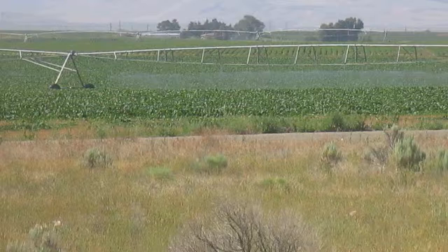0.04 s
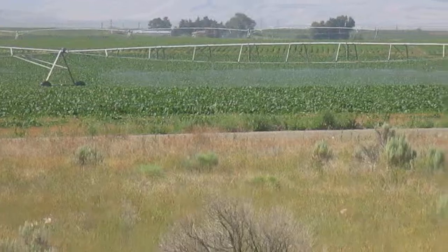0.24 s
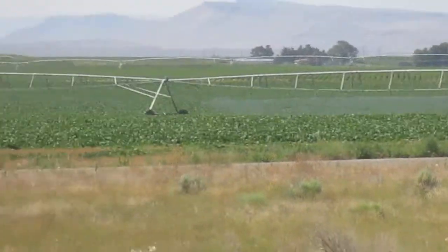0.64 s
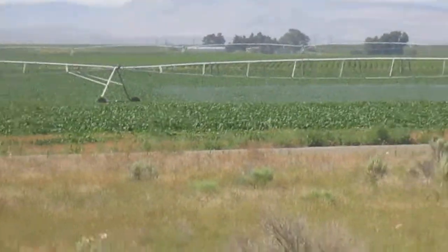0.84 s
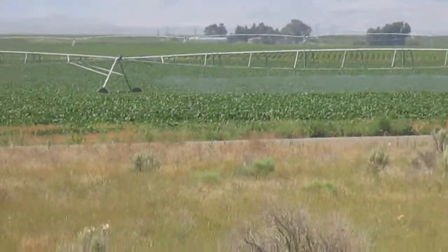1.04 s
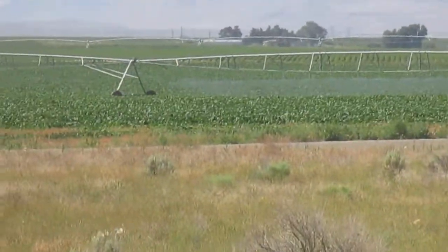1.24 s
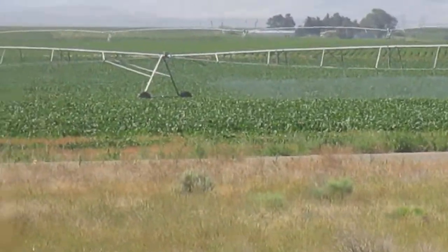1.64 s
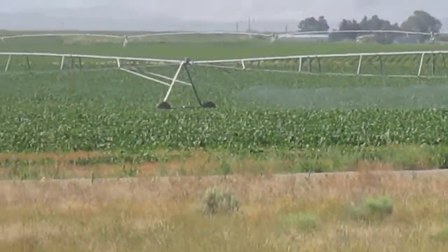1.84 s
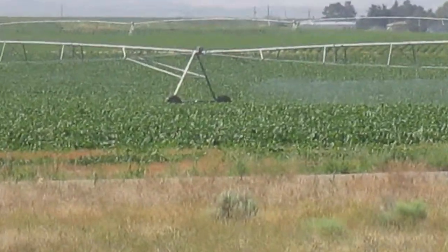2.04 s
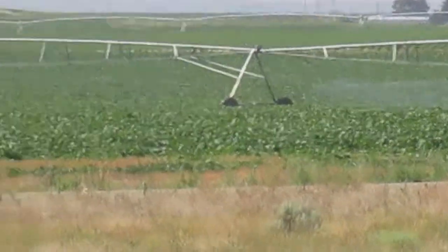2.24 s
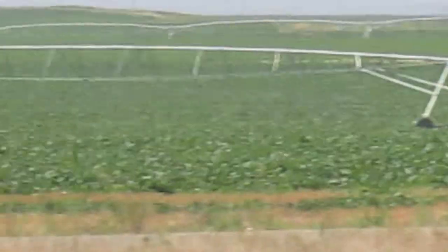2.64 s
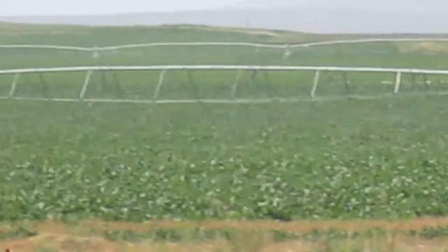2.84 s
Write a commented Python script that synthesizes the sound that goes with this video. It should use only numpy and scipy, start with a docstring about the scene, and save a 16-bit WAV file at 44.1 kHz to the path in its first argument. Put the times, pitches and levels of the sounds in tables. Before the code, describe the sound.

Wind on the microphone starts abruptly at about 0.2 seconds, with a low rumble, flutter and quick hard buffets that pop slightly. The gusts are strongest until 2 seconds, then ease, with another push near 2.5. Light camera clicks and creaks come around 0.5, 0.85, 1.2 and 2.55 seconds. Underneath, a cricket chirps very faintly about three times a second over the field's soft hiss.

```python
"""At the edge of a farm field, gusty wind blows on a camera microphone.
Swirls of air (eddies) tumble over its opening: hard buffets that just overload it,
a restless flutter, small pops and a low rumble. The camera body clicks and creaks in the hand.
A cricket chirps faintly in the grass by rubbing its wings, over far crickets and a soft hiss."""
import sys
import numpy as np
from scipy import signal
from scipy.fft import rfft, irfft
from scipy.io import wavfile
from scipy.ndimage import uniform_filter1d

SR = 44100
rng = np.random.default_rng(int(sys.argv[2]) if len(sys.argv) > 2 else 0)


def log_audio(samples):
    """Write samples as a 16-bit WAV file to the path given in sys.argv[1]."""
    # one column per channel
    frames = np.atleast_2d(samples).T
    # limit to full scale, then quantise
    limited = np.clip(frames, -1, 1)
    pcm = np.round(limited * 32767).astype(np.int16)
    wavfile.write(sys.argv[1], SR, pcm)


N = 127890
TIME = np.arange(N) / SR

# hard shoves of wind: peak t/s, length/s, level/dB, roll-off f/Hz (higher is brighter)
BUFFETS = [(0.259, 0.015, -8, 242), (0.336, 0.036, -11, 268.5), (0.36, 0.095, -19.5, 186),
           (0.499, 0.016, -14.5, 232), (0.523, 0.022, -7.5, 258), (0.542, 0.0088, -7, 360),
           (0.584, 0.011, -11, 332), (0.724, 0.017, -15.5, 310), (0.803, 0.018, -13, 217),
           (0.899, 0.045, -17.5, 190), (0.924, 0.012, -6, 210), (0.98, 0.024, -8.5, 297),
           (1.036, 0.04, -10, 268), (1.075, 0.037, -19.5, 372), (1.122, 0.021, -8.5, 310),
           (1.173, 0.034, -10.5, 300), (1.194, 0.033, -11, 256), (1.231, 0.094, -15.5, 356),
           (1.359, 0.027, -14.5, 230), (1.45, 0.022, -11.5, 244.5), (1.489, 0.026, -12, 257),
           (1.515, 0.025, -12, 267), (1.627, 0.024, -12.5, 186.5), (1.67, 0.024, -15.5, 261),
           (1.688, 0.025, -13, 260), (1.749, 0.045, -13.5, 270), (1.775, 0.035, -10.5, 334),
           (1.8, 0.036, -11.5, 444), (1.826, 0.096, -21.5, 376), (1.858, 0.034, -22.5, 419),
           (1.912, 0.038, -14.5, 394), (1.95, 0.045, -10.5, 327), (1.988, 0.06, -17.5, 475),
           (2.081, 0.04, -23.5, 294), (2.181, 0.017, -18, 350), (2.225, 0.026, -14, 285),
           (2.253, 0.04, -11.5, 321), (2.287, 0.035, -17, 283), (2.337, 0.011, -21.5, 310),
           (2.389, 0.041, -19.5, 302), (2.449, 0.0094, -27, 413), (2.484, 0.015, -10, 190),
           (2.526, 0.035, -14.5, 354), (2.624, 0.077, -21, 202), (2.705, 0.072, -25, 185)]
# airflow between the buffets: t/s, level/dB, roll-off f/Hz
AIRFLOW = [(0.24, -16.5, 170), (0.39, -26.5, 280), (0.43, -19.5, 120), (0.6, -18.5, 170), (0.7, -28, 160),
           (0.8, -22.5, 170), (0.87, -29.5, 190), (1.0, -16, 180), (1.25, -27.5, 190), (1.32, -31, 150),
           (1.39, -21.5, 180), (1.43, -36, 160), (1.53, -10.5, 180), (1.6, -38, 120), (1.75, -19.5, 190),
           (1.89, -30, 240), (2.04, -29.5, 230), (2.14, -24.5, 220), (2.2, -24.5, 160), (2.3, -24, 210),
           (2.5, -20, 210), (2.58, -50, 190), (2.66, -24.5, 210), (2.78, -56.5, 140), (2.84, -39.5, 140),
           (2.9, -22, 220)]
# cracks on the hardest buffets: t/s, peak level/dB, roll-off f/Hz
CRACKS = [(.335, -20.5, 1300), (.522, -24.5, 1300), (.543, -21, 300), (.982, -44, 387), (1.796, -18, 870),
          (1.918, -11, 245), (1.978, -23.5, 272), (1.989, -15, 250), (2.182, -30, 200), (2.25, -18.5, 220)]
# air rumbling round the whole camera: t/s, level/dB
RUMBLE_LEVELS = [(.25, -12.5), (.4, -21), (.6, -24), (.8, -17.5), (.95, -24.5), (1.12, -14), (1.25, -21),
                 (1.4, -26.5), (1.52, -20.5), (1.6, -28), (1.76, -17), (1.9, -27), (2.17, -25.5),
                 (2.25, -21.5), (2.5, -19.5), (2.57, -29), (2.7, -35), (2.8, -34.5), (2.9, -20)]
# the rumble's tone colour, or how strong each pitch is: f/Hz, level/dB
RUMBLE_COLOUR = [(10, -24.5), (22, -7), (40, -5.5), (62, -1), (95, -3.5), (135, -9), (185, -11),
                 (270, -27.5), (600, -86.5), (2000, -150)]
# big swirls that thump: peak t/s, level/dB
THUMPS = [(.337, -7.5), (.67, -16.5), (.9, -12), (.984, -11.5), (1.748, -13.5), (2.098, -17.5),
          (2.508, -16)]
# clicks of the camera body: t/s, level/dB, fade time/s
CLICKS = [(0.335, -44.5, .005), (0.52, -55, 0.0038), (0.724, -47, 0.0019), (0.75, -49.5, 0.0051),
          (0.8406, -31, 0.0012), (0.847, -33, 0.0023), (0.865, -36.5, 0.0037), (.898, -34, 0.0035),
          (1.191, -42.5, 0.0052), (1.198, -47, 0.0054), (1.794, -43.5, .003), (2.556, -38.5, 0.0059),
          (2.559, -35.5, 0.0023)]
# their tone colour: f/Hz, level/dB
CLICK_COLOUR = [(500, -33.5), (1300, -7), (2000, 11.5), (3000, 0), (4000, -4), (4900, -9.5), (7000, -6.5),
                (9500, -6.5), (12000, -18), (16000, -27)]
# creaks under the grip: peak t/s, level/dB, length/s
CREAKS = [(0.334, -47.5, .045), (0.513, -42, 0.01), (0.621, -57, 0.049), (1.195, -39, 0.05),
          (2.541, -55, 0.035), (2.563, -27, 0.01)]
# their tone colour: f/Hz, level/dB
CREAK_COLOUR = [(700, -32), (1400, -27), (1750, 4), (2050, 4.5), (2500, -6.5), (3500, -19.5), (5000, -30),
                (16000, -33)]
# notes the casing rings at: f/Hz, gain/dB, time to fade by 60 dB/s
CASING_NOTES = [(2024, -50.5, 0.061), (2810, -61, .12)]
# cricket chirps: first stroke t/s, number of wing strokes, level/dB
CHIRPS = [(0.274, 3, -59.5), (0.487, 4, -63), (.759, 4, -62), (1.072, 3, -69), (1.326, 3, -68),
          (1.556, 3, -65.5), (1.837, 3, -78.5), (2.173, 4, -74.5), (2.446, 3, -73.5), (2.703, 4, -78)]
# tone colour of the far crickets: f/Hz, level/dB
CHORUS_COLOUR = [(4300, -40), (5000, -8), (5250, 2.5), (5500, -6.5), (6000, -37.5)]
# hiss of the field: t/s, level/dB
HISS_LEVELS = [(.24, -50.5), (.33, -56.5), (.42, -63), (.61, -58), (.68, -64), (.8, -60.5), (1.0, -66),
               (1.3, -69.5), (1.65, -71), (1.85, -75), (2.15, -77), (2.5, -74.5), (2.9, -71.5)]
# its tone colour: f/Hz, level/dB
HISS_COLOUR = [(100, -10.5), (700, 3), (1400, 0), (2200, 0.5), (3400, -7), (4600, -12.5), (7000, -11.5),
               (9500, -12.5), (12000, -19.5), (16000, -18)]


def eddy(length_s, db, roll_off_hz, low_cut_hz=102, waver_depth=0.18, waver_hz=110):
    """One swirl crosses the opening: a pressure wobble, louder and brighter when it speeds up."""
    t = (np.arange(2 ** 13) - 2 ** 12) / SR
    opening = lambda f: np.exp(-(f / roll_off_hz) ** 1.454) * f ** 2 / (f ** 2 + low_cut_hz ** 2)
    stir, waver = rng.standard_normal((2, len(t)))
    speed = np.exp(waver_depth * unit_power(filtered(waver, lambda f: np.exp(-(f / waver_hz) ** 2))))
    pressure = steadied(filtered(stir, opening), window_s=0.016)
    wobble = np.interp(np.cumsum(speed), np.arange(len(t)), pressure)  # read at the wavering speed
    envelope = np.exp(-(np.pi * t / length_s) ** 2)
    return from_db(db) * unit_power(wobble * speed * envelope) * np.sqrt(np.mean(envelope ** 2))


def buffets(boost_db=2):
    """Strong eddies hit the microphone one by one."""
    out = np.zeros(N)
    for s, length_s, db, roll_off_hz in BUFFETS:
        add_centred(out, s, eddy(length_s, db + boost_db, roll_off_hz))
    return out


def flutter(per_s=70, length_s=0.035, trim_db=-1, spread_db=2.5, spread_octaves=0.33):
    """A stream of small eddies whose strength and brightness follow the airflow."""
    out = np.zeros(N)
    for k, (late, louder, brighter) in enumerate(rng.standard_normal((int(per_s * N / SR), 3))):
        s = (k + 0.14 * late) / per_s
        db = curve(AIRFLOW, s) + trim_db + spread_db * louder
        roll_off_hz = curve(AIRFLOW, s, column=2) * 2 ** (spread_octaves * brighter)
        add_centred(out, s, eddy(length_s, db, roll_off_hz))
    return out


def spike(roll_off_hz, steepness, low_cut_hz=487):
    """A sudden kink in the air pressure, of height 1."""
    band = lambda f: f ** 2 / (f ** 2 + low_cut_hz ** 2) * np.exp(-(f / roll_off_hz) ** steepness)
    kink = filtered(signal.unit_impulse(2 ** 10, "mid"), band)
    return kink / kink.max()


def cracks():
    """Single sharp kinks at the crests of the hardest buffets."""
    out = np.zeros(N)
    for s, db, roll_off_hz in CRACKS:
        add_centred(out, s, from_db(db) * spike(roll_off_hz, steepness=0.81))
    return out


def sputter(wind, per_s=97, boost_db=6, spread_db=2.5, above_hz=700):
    """Air tears off the opening in uneven little pops, sized by the wind's middle pitches."""
    middle = filtered(wind, lambda f: f ** 4 / (f ** 4 + above_hz ** 4))
    strength = np.sqrt(np.abs(uniform_filter1d(middle ** 2, size=700)))
    out, pop = np.zeros(N), spike(roll_off_hz=400, steepness=1.234)
    for k, (late, louder, sign) in enumerate(rng.standard_normal((int(per_s * N / SR), 3))):
        s = (k + late / 2) / per_s
        height = np.interp(s, TIME, strength) * from_db(boost_db + spread_db * louder)
        add_centred(out, s, np.sign(sign) * height * pop)
    return out


def rumble(trim_db=-0.5):
    """Large slow swirls roll round the camera, now and then with a thump."""
    rolling = from_db(curve(RUMBLE_LEVELS, TIME) + trim_db)
    thumps = sum(from_db(db) * swell(TIME - s, length_s=0.045) for s, db in THUMPS)
    return (rolling + thumps) * steadied(noise(RUMBLE_COLOUR), window_s=0.019)


def handling():
    """Plastic clicks and creaks in the hand, which sets the casing ringing."""
    clicks = sum(from_db(db) * (TIME >= s) * np.exp(-np.abs(TIME - s) / fade) for s, db, fade in CLICKS)
    creaks = sum(from_db(db) * swell(TIME - s, length_s) for s, db, length_s in CREAKS)
    contact = clicks * noise(CLICK_COLOUR) + creaks * steadied(noise(CREAK_COLOUR), window_s=0.0014)
    out = contact
    for hz, db, ring_s in CASING_NOTES:
        decay, turn = from_db(-60 / (ring_s * SR)), 2 * np.pi * hz / SR  # both per sample
        feedback = decay * np.cos(turn)
        ring = signal.lfilter([1, -feedback], [1, -2 * feedback, decay ** 2], contact + 1e-18)
        out = out + from_db(db) * ring
    return out


def cricket(pitch_hz=5455, droop_hz_per_s=36000, roughness=0.4, step_s=0.034, lead_in_db=-11.5):
    """Each chirp is a few wing strokes, each a whistle that holds its pitch and then droops."""
    out, t = np.zeros(N), np.arange(-2 ** 10, 2 ** 10) / SR
    cycles = pitch_hz * t - droop_hz_per_s * np.maximum(t + 0.004, 0) ** 2 / 2
    for s, strokes, db in CHIRPS:
        for k in range(-1, int(round(strokes))):  # stroke -1 is a soft lead-in
            rasp = unit_power(filtered(rng.standard_normal(len(t)), lambda f: np.exp(-f / 300)))
            whistle = np.sqrt(2) * np.sin(2 * np.pi * (cycles + rng.random()) + roughness * rasp)
            gain = from_db(db + lead_in_db * (k < 0))
            add_centred(out, s + k * step_s, gain * swell(t, length_s=0.021) * whistle)
    return out


def scattered(sound, echo_db=-11, fade_s=0.25):
    """A sound plus its faint, blurred echo from the crops."""
    t = np.arange(SR // 4) / SR
    tail = rng.standard_normal(len(t)) * from_db(-60 * t / fade_s)
    return sound + from_db(echo_db) * signal.fftconvolve(sound, tail / np.linalg.norm(tail))[:N]


def field_hiss():
    """The field hisses softly, its level drifting."""
    return from_db(curve(HISS_LEVELS, TIME)) * noise(HISS_COLOUR)


def far_crickets(db=-88):
    """Many far crickets merge into a faint twitter."""
    return from_db(db) * noise(CHORUS_COLOUR)


def from_db(db):
    """Turn decibels into a number to multiply by."""
    return 10 ** (np.asarray(db) / 20)


def unit_power(x):
    """Scale a sound to an average power of 1."""
    return x / np.sqrt(np.mean(x ** 2) + 1e-20)


def curve(rows, s, column=1):
    """Read a table at times s, joining its rows with straight lines."""
    rows = np.array(rows)
    return np.interp(s, rows[:, 0], rows[:, column])


def filtered(x, gain):
    """Turn each frequency f up or down by gain(f)."""
    hz = np.maximum(np.fft.rfftfreq(len(x), 1 / SR), 1)
    return irfft(rfft(x) * gain(hz), len(x))


def noise(colour):
    """Noise of power 1 with the given tone colour."""
    hz, db = np.transpose(colour)
    gain = lambda f: from_db(np.interp(np.log(f), np.log(hz), db))
    return unit_power(filtered(rng.standard_normal(N), gain))


def steadied(x, window_s):
    """Take the slow chance swings out of a noise's level."""
    size = max(int(window_s * SR), 8)
    return x / np.sqrt(uniform_filter1d(uniform_filter1d(x ** 2, size), size) + 1e-12)


def swell(t, length_s):
    """A smooth rise and fall centred on t = 0."""
    return np.maximum(np.cos(np.pi * np.clip(t / length_s, -.5, .5)), 0) ** 1.5


def add_centred(out, s, x):
    """Mix x into out with its middle at time s."""
    at = int(s * SR) - len(x) // 2 + np.arange(len(x))
    inside = (at >= 0) & (at < N)
    out[at[inside]] += x[inside]


def scene():
    """Wind and handling over the quiet field, in one channel."""
    field = field_hiss() + scattered(cricket()) + far_crickets()
    wind = buffets() + flutter()
    return (field + handling() + rumble() + wind + sputter(wind) + cracks())[None]


def record(dry, start_s=0.243, ceiling=0.99, cutoff_hz=15800):
    """The sound switches on abruptly, the hardest buffets overload, the highest treble is cut."""
    live = dry * np.clip((TIME - start_s) * 1000, 0, 1)  # 1 ms fade-in
    squashed = live / (1 + (live / ceiling) ** 8) ** (1 / 8)
    treble_cut = signal.ellip(10, .1, 80, cutoff_hz, fs=SR, output="sos")
    return signal.sosfilt(treble_cut, squashed)


dry = scene()
out = record(dry)
log_audio(out)
```